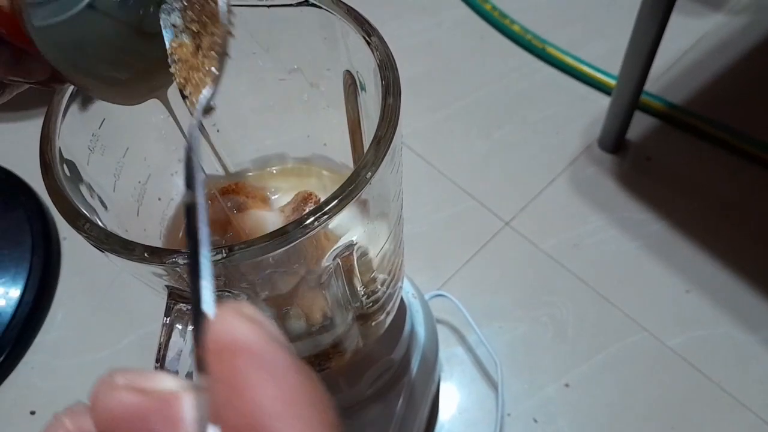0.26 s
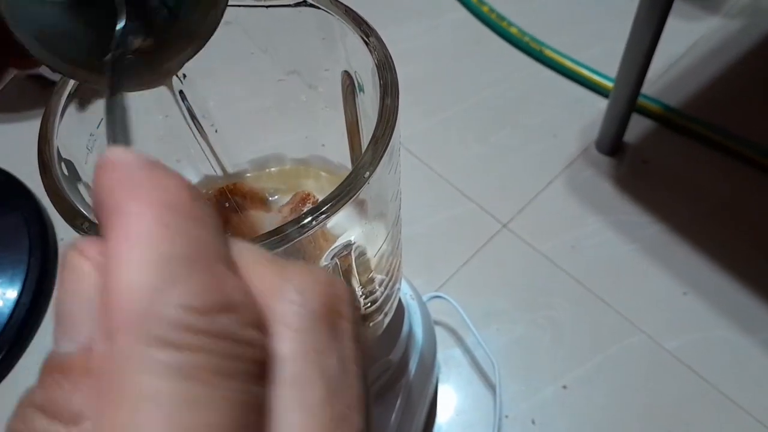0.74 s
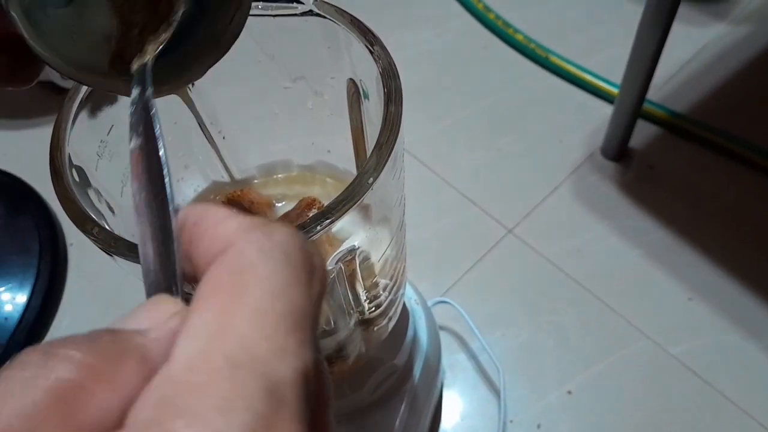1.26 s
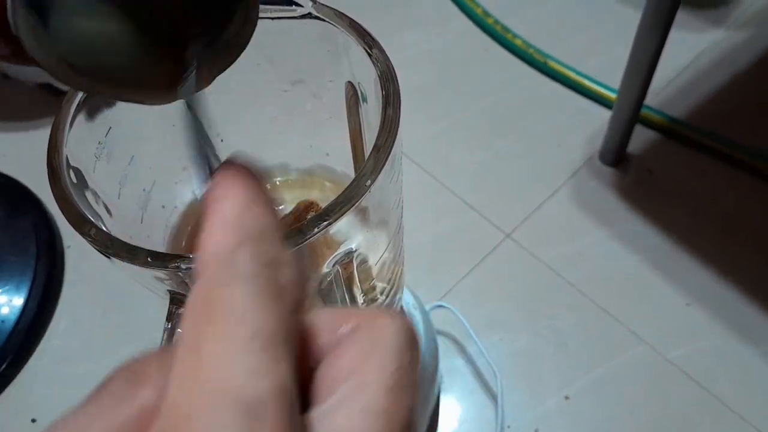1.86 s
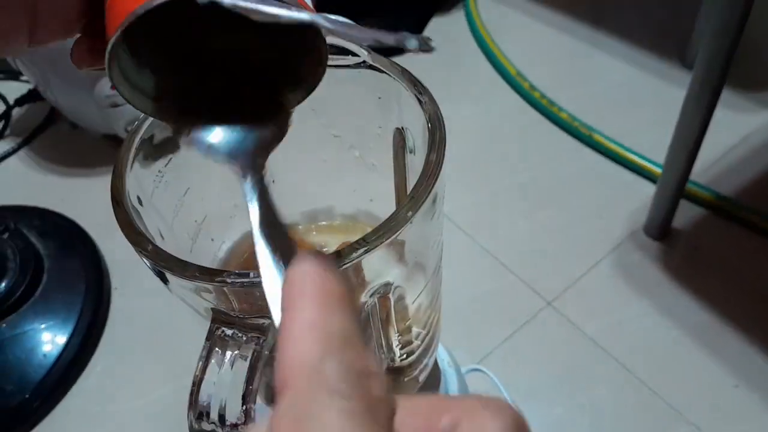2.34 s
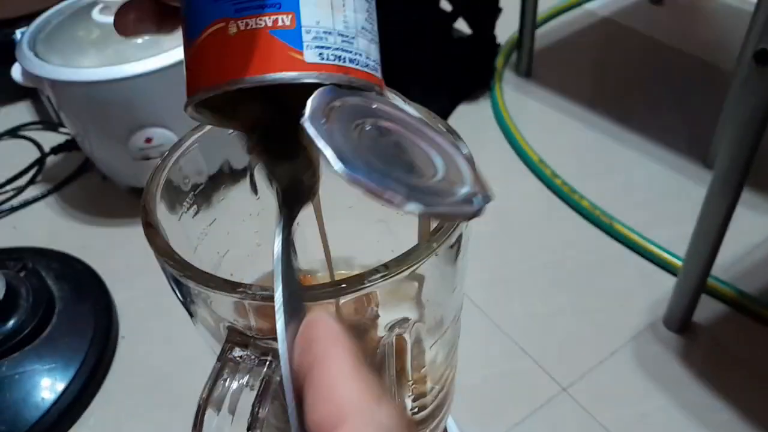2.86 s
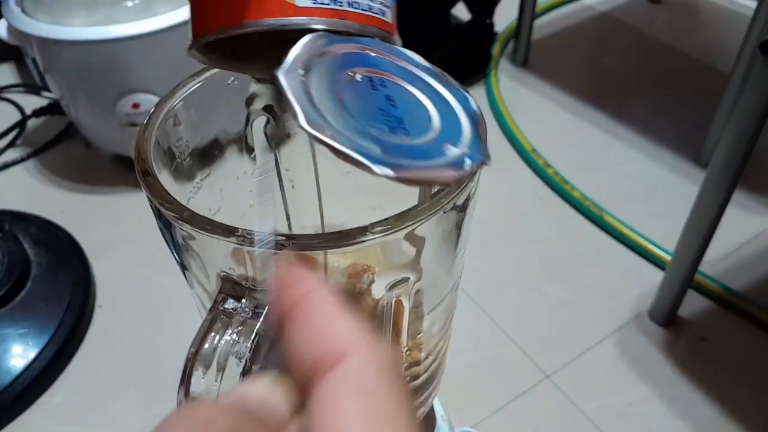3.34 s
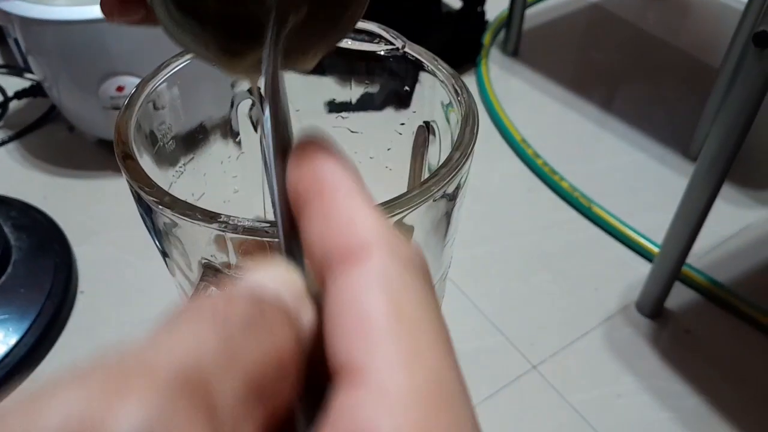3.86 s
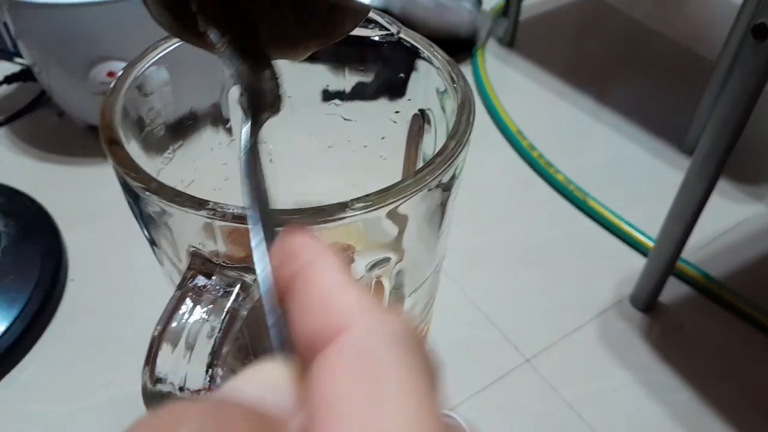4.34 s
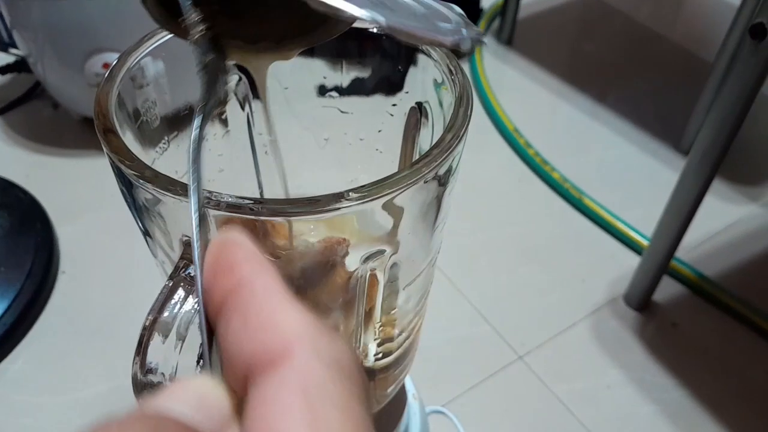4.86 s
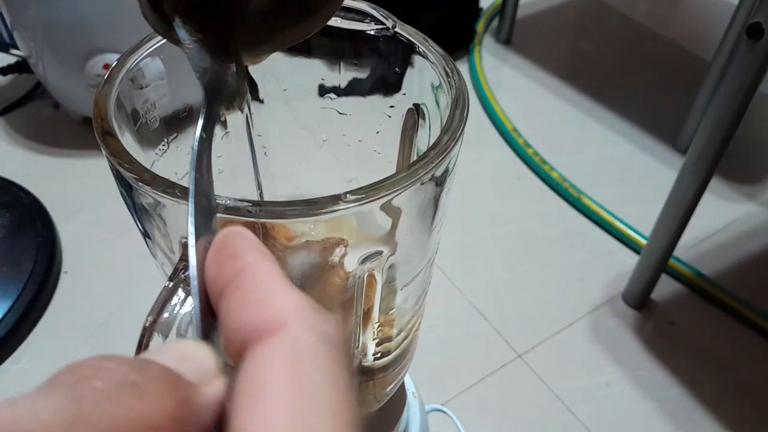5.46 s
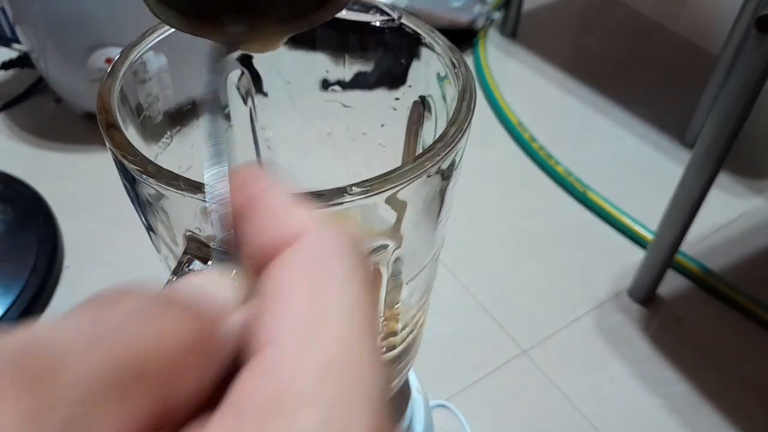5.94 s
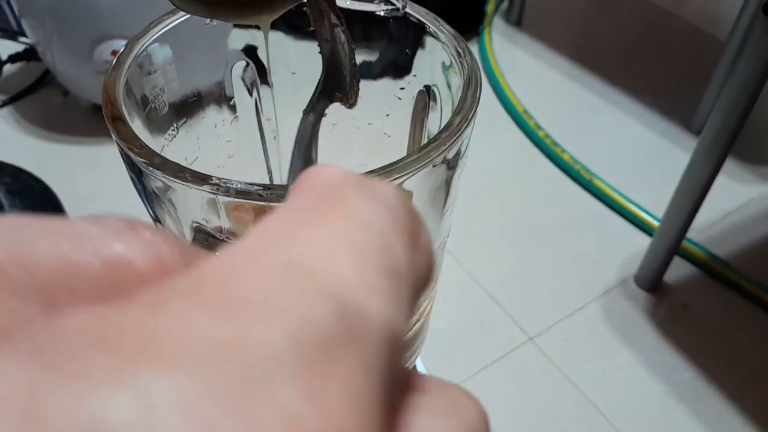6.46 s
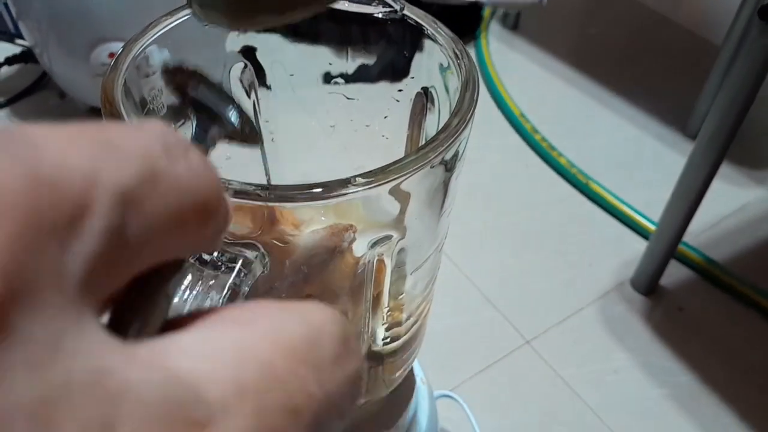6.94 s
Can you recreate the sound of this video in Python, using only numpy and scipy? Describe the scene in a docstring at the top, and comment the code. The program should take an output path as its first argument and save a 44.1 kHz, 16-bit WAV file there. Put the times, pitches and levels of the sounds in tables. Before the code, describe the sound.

Close, dry-sounding spoon work in a small kitchen: a metal spoon strikes and drags along the inner wall of a tin damped by hand and sticky milk. Bright scrapes and tiny squeaks come first, then softer wet strokes, a squeaky burst midway, then duller hollow knocks and scrapes to the end. The tin sits left of centre with short shifting reflections; a quiet wavering motor hum and low rumble continue underneath.

```python
"""A steel spoon knocks and scrapes inside a tin of thick milk held over a glass blender jar.
Hand and milk damp the tin: each blow, a push plus noisy chatter into damped modes, is a hollow clack
with a short metallic ring. Strokes drive the same modes with trains of tiny slips and rasp;
gliding tones squeak. Random echoes make the small kitchen; a motor hums faintly in low rumble."""
import sys
import numpy as np
from scipy import signal
from scipy.fft import rfft, irfft
from scipy.io import wavfile
from scipy.ndimage import map_coordinates

SR = 44100
rng = np.random.default_rng(int(sys.argv[2]) if len(sys.argv) > 2 else 0)


def digitize_waveform(pressure):
    """Quantize a signal to 16-bit integers and store it at the path in sys.argv[1].

    Rows of a 2-D input are taken as channels; values are limited to [-1, 1].
    """
    field = np.atleast_2d(pressure).T
    bounded = np.clip(field, -1, 1)
    quanta = np.round(bounded * 32767).astype(np.int16)
    wavfile.write(sys.argv[1], SR, quanta)


N = 317961

HOLLOW_HZ = 1040  # usual pitch of the tin's hollow
# mode of the tin's base: [f/Hz, width/Hz, relative drive/dB]
BASE_MODES = [(618.7, 44, 0)]


def amp(db):
    """Decibels to gain."""
    return 10 ** (np.asarray(db) / 20)


def unit(x):
    """Scales to rms 1."""
    return x / np.sqrt(np.mean(x ** 2) + 1e-20)


def read(points, hz):
    """Reads a table of [f/Hz, value] on a log-frequency axis."""
    f, value = np.transpose(points)
    return np.interp(np.log(hz + 1), np.log(f), value)


def track(points, s):
    """Reads a table of [t/s, value] at time s."""
    return np.interp(s, *np.transpose(points))


def add(mix, s, sound):
    """Adds a sound into the mix at time s."""
    part = mix[round(s * SR):][:len(sound)]
    part += sound[:len(part)]


def colour(x, points):
    """Filters by a table of [f/Hz, gain/dB]."""
    n = x.shape[-1]
    gain_db = read(points, np.fft.rfftfreq(n, 1 / SR))
    return irfft(rfft(x) * amp(gain_db), n)


def wander(n, rate_hz):
    """Smooth chance of size about 1, with rate_hz new values a second."""
    knots = np.arange(n) * rate_hz / SR
    return np.interp(knots, np.arange(4096), rng.standard_normal(4096))


def background(air_db=-51.5, waver_db=2, waver_hz=1.684, waver_rate_hz=9, left_db=1):
    """A motor's wavering hum in the low rumble of the room, partly alike on both sides."""
    # rumble spectrum: [f/Hz, relative density/dB]
    rumble = [(25, -21), (36, -31), (50, -0.5), (68, 2.5), (100, 1), (150, -8), (260, -9.5), (420, -17),
              (750, -16), (2000, -23), (3200, -31.5), (15000, -43)]
    # left-right correlation of the rumble: [f/Hz, likeness]
    likeness = [(25, 0.59), (60, 0.87), (150, 0.96), (350, 0.65), (1000, 0.046), (8000, 0.069)]
    # hum partials ahead of the left-right tilt: [f/Hz, mean level/dB]
    hum_partials = [(95.5, -64.5), (119.6, -54), (240, -70), (302, -73), (340, -74)]
    same = np.clip(read(likeness, np.fft.rfftfreq(N, 1 / SR)), -1, 1)
    a, b = rfft(rng.standard_normal((2, N)))
    pair = np.array([a, same * a + np.sqrt(1 - same ** 2) * b])
    air = unit(colour(irfft(pair, N), rumble))
    hum = 0
    for hz, db in hum_partials:
        level = amp(db + waver_db * wander(N, waver_rate_hz))
        turns = np.cumsum(hz + waver_hz * wander(N, waver_rate_hz)) / SR
        hum = hum + level * unit(np.sin(2 * np.pi * turns))
    return (amp(air_db) * air + hum) * amp([[left_db], [-left_db]])


def echoes(near_db=-13, near_t60_s=0.076, room_db=-20, density_per_s=4000):
    """One pair of responses: quick scatter off jar and hands, then the tiled room."""
    # room decay: [f/Hz, t60/s]
    decay = [(300, 0.31), (1000, 0.17), (3000, 0.2), (7000, 0.27), (15000, 0.16)]
    t = np.arange(SR // 2) / SR
    signs = rng.choice([-1., 1.], (2, 2, len(t)))
    near, far = signs * (rng.random((2, 2, len(t))) < density_per_s / SR)
    near = near * (t > .001) * amp(-60 * t / near_t60_s)
    f, frame_s, z = signal.stft(far * (t > .008), SR, nperseg=256)
    z = z * amp(-60 * frame_s / read(decay, f)[:, None])
    far = signal.istft(z, SR, nperseg=256)[1][:, :len(t)]
    return (amp(near_db) * unit(near) + amp(room_db) * unit(far)) / np.sqrt(len(t))


def kitchen(x, count=3):
    """The tin is close on the left and sways in the hand, so its echoes keep changing."""
    # right side: [f/Hz, level re left/dB]
    right_ear = [(300, -14), (600, -3.5), (1100, -22.5), (2000, -7.5), (2900, -2), (4500, -14), (8000, -8),
                 (14000, -26)]
    t = np.arange(N) / SR
    lag_s = np.interp(t, [1.5, 3, 7], [.00036, .00027, .00025])  # the right side hears it later
    right = colour(map_coordinates(x, [(t - lag_s) * SR], order=3), right_ear)
    # the wall radiates all round: [f/Hz, gain/dB]
    thrown = colour(x, [(600, -4), (1100, 3), (2800, 7), (6000, 1.0), (14000, 4.0)])
    out = np.array([x, right])
    for k in range(count):
        share = np.sqrt(2 / count) * np.cos(np.pi * (t + k / count))
        out = out + signal.oaconvolve((thrown * share)[None], echoes(), axes=1)[:, :N]
    return out


def ring(force, modes, low_hz, shift=1, spot_db=0):
    """Drives damped modes of alternating sign, to rms 1; the spot touched favours some, shift may glide."""
    out = 0
    for k, (hz, width_hz, db) in enumerate(modes):
        turn = np.exp(2j * np.pi * np.cumsum(hz * shift * np.ones(len(force))) / SR)
        r = np.exp(-np.pi * width_hz / SR)
        gain = (-1) ** k * amp(db + spot_db * rng.standard_normal())
        out = out + gain * (turn * signal.lfilter([1 - r], [1, -r], force / turn)).imag
    high_pass = signal.butter(3, low_hz, "high", fs=SR, output="sos")  # small things radiate little bass
    return unit(signal.sosfilt(high_pass, out))


def tin(s, forces, pitch_hz, grip=1, spot_db=4.0, focus_db=8, focus_octaves=0.099):
    """The four voices of spoon and tin at time s: hollow with base, wall, steel, edge."""
    # modes of hollow (at its usual pitch), wall before focus, steel on steel, and the spoon's
    # highest, crowded modes: [f/Hz, width/Hz, relative drive/dB]
    hollow_modes = [(998, 98.9, 2.53), (1110, 115.1, 1.65)]
    wall_modes = [(1740, 260, -5.5), (2026, 170, -2), (2421, 54, 5.5), (2885, 140, -2.5), (3200, 93, -2.5),
                  (3503, 183, -3), (4010, 58, -7.5)]
    steel_modes = [(4344, 520, 2.5), (5060, 410, 5), (5250, 63, 9.5), (5650, 440, 3), (6420, 22, -15)]
    edge_modes = [(7620, 1900, -6.5), (8820, 183, 0.5), (9600, 1140, -8), (11600, 530, -5.5),
                  (12900, 1070, -7.5), (15600, 530, -13)]
    # the part of the wall touched favours modes near one pitch: [t/s, f/Hz]
    wall_focus = [(0.65, 2270), (0.8, 2990), (1.74, 2660), (2.15, 3020), (2.52, 2500), (3.0, 3280),
                  (3.62, 3200), (4.2, 2720), (5.35, 2700), (6.6, 2440)]
    # base strength, rising through the scene and falling again at the end: [t/s, level re hollow/dB]
    base_strength = [(0.6, -29), (3.6, -24), (4.5, -18.5), (5.8, -16.5), (6.7, -29)]
    base = amp(track(base_strength, s)) * ring(forces[0], BASE_MODES, low_hz=470)
    focus_hz = track(wall_focus, s)
    focused = []
    for hz, width_hz, db in wall_modes:
        nearness = np.exp(-(np.log2(hz / focus_hz) / focus_octaves) ** 2)
        focused.append((hz, width_hz, db + focus_db * nearness))
    hollow = ring(forces[0], hollow_modes, low_hz=344, shift=pitch_hz / HOLLOW_HZ)
    wall = ring(forces[1], focused, low_hz=1400, shift=grip, spot_db=spot_db)
    steel = ring(forces[2], steel_modes, low_hz=3360, shift=grip, spot_db=spot_db)
    edge = ring(forces[2], edge_modes, low_hz=6170, shift=grip)
    return hollow + base, wall, steel, edge


def stick_slip(n, rate_hz=700, glide=0.058, glide_rate_hz=25, jitter=.017, jitter_rate_hz=1200):
    """Nearly regular slips whose rate follows the unsteady speed of the hand."""
    speed = 1 + glide * wander(n, glide_rate_hz) + jitter * wander(n, jitter_rate_hz)
    turns = np.cumsum(rate_hz * speed) / SR
    slips = np.diff(np.floor(turns), prepend=0)
    return unit(slips - slips.mean())


def drag(s, n, pitch_hz, slips_per_s=1800, slip_spread_db=3.5, judder_db=3.0, judder_rate_hz=130,
         rub=0.097, grip_drift=0.016, drift_rate_hz=22, snags_per_s=110, snag_db=20):
    """The edge drags in slips, even or uneven, and snags; modes bend as the point of contact travels."""
    # evenness of stick-slip, less once the edge is coated with milk: [t/s, share 0-1]
    bite_track = [(0.8, 0.62), (3.7, 0.22), (4.6, 0), (6.6, 0.18)]
    slip_size = amp(slip_spread_db * np.minimum(rng.exponential(1, SR), 4))
    slips = (rng.random(SR) < slips_per_s / SR) * slip_size
    grit = unit(slips - slips.mean() + rub * rng.standard_normal(SR))[:n]
    snags = amp(snag_db) * (rng.random(SR) < snags_per_s / SR)[:n]
    bite = np.clip(track(bite_track, s), 0, 1)
    rasp = np.sqrt(1 - bite) * grit + np.sqrt(bite) * stick_slip(n)
    judder = amp(judder_db * wander(n, judder_rate_hz))
    forces = (np.array([grit, rasp, rasp]) + snags) * judder
    return tin(s, forces, pitch_hz, 1 + grip_drift * wander(n, drift_rate_hz))


def base_rubs():
    """Rubbing the bottom of the tin, noise into its base mode, gives a low, dull note."""
    # rubs: [t/s, length/s, level/dB]
    rub_events = [(1.88, 0.06, -42.5), (3.722, 0.033, -40), (5.685, 0.03, -41), (5.876, 0.043, -37),
                  (6.385, 0.13, -47.5)]
    out = np.zeros(N)
    for s, length_s, db in rub_events:
        n = round(length_s * SR)
        note = ring(rng.standard_normal(n), BASE_MODES, low_hz=463)
        add(out, s, amp(db) * note * signal.windows.tukey(n, .5))
    return out


def slides(pitch_hz=1010, wall_db=-9, steel_db=-17, edge_db=-17):
    """Soft, wet strokes through the milk, with little treble; voice levels are re hollow."""
    # slides: [t/s, length/s, hollow level/dB]
    slide_events = [(0.691, 0.073, -27.5), (2.194, 0.17, -44.5), (2.556, 0.093, -41.5), (2.831, 0.11, -48),
                    (3.056, 0.15, -51.5), (3.282, 0.024, -42.5), (3.333, 0.13, -51), (3.569, 0.028, -29),
                    (3.744, 0.066, -38.5), (3.996, 0.1, -50), (4.188, 0.19, -43.5), (4.89, 0.052, -43.5),
                    (5.442, 0.042, -35.5), (5.911, 0.17, -48), (6.277, 0.052, -40.5), (6.388, 0.091, -42)]
    out = np.zeros(N)
    for s, length_s, db in slide_events:
        n = round(length_s * SR)
        voices = amp([[0], [wall_db], [steel_db], [edge_db]]) * drag(s + length_s / 2, n, pitch_hz)
        add(out, s, amp(db) * voices.sum(0) * signal.windows.tukey(n, .5))
    return out


def squeaks(jitter=.022, jitter_rate_hz=900, octave_db=-14):
    """Even stick-slip of the edge gives a short, unsteady, gliding whistle with its octave."""
    # squeaks: [t/s, length/s, first f/Hz, last f/Hz, level/dB]
    squeak_events = [(0.738, 0.016, 3870, 3060, -19), (0.774, 0.024, 2940, 2690, -29.5),
                     (0.818, 0.018, 2705, 2860, -26), (0.848, 0.0182, 2830, 3595, -24),
                     (1.526, 0.026, 2968, 2627, -30.5), (1.886, 0.039, 5250, 5260, -35),
                     (2.181, 0.0029, 3900, 3800, -26), (3.661, 0.041, 3194, 3640, -27.5),
                     (3.943, 0.025, 2915, 2900, -38)]
    out = np.zeros(N)
    for s, length_s, first_hz, last_hz, db in squeak_events:
        n = round(length_s * SR)
        hz = np.linspace(first_hz, last_hz, n) * (1 + jitter * wander(n, jitter_rate_hz))
        angle = 2 * np.pi * np.cumsum(hz) / SR
        whistle = unit(np.sin(angle) + amp(octave_db) * np.sin(2 * angle))
        add(out, s, amp(db) * whistle * signal.windows.tukey(n, .6))
    return out


def touches(level_db=-18, skid_s=0.0029, hollow_db=-3):
    """Light contacts of the spoon's edge, decaying noise bursts, tick and softly stir the hollow."""
    # touches: [t/s, level ahead of level_db/dB]
    touch_events = [(0.536, -38.5), (0.5736, -37), (0.589, -39.5), (0.616, -38.5), (0.9835, -42.5),
                    (2.82, -37.5), (5.3831, -30), (5.442, -39), (5.4636, -48)]
    out, t = np.zeros(N), np.arange(SR // 8) / SR
    for s, db in touch_events:
        forces = rng.standard_normal((3, len(t))) * np.exp(-t / skid_s)
        hollow, wall, steel, edge = tin(s, forces, HOLLOW_HZ)
        add(out, s, amp(db + level_db) * (amp(hollow_db) * hollow + .5 * (wall + steel + edge)))
    return out


def strokes(hollow_db=4.0, wall_db=3.0, steel_db=4, edge_db=5.0, contact_s=0.0019, lift_s=0.082,
            touch_down_db=-16.5, lift_db_per_s=519, sag_octaves_per_s=0.32):
    """Firm scrapes along the wall: the spoon presses in, holds, lifts; pitch sinks as it draws back."""
    # scrapes, levels ahead of the voice gains: [t/s, press-in/s, hold/s, level/dB, wall/dB,
    # steel/dB, fine rasp/dB (these three re level), hollow f at mid-hold/Hz]
    stroke_events = [(0.686, 0.059, 0.11, -32, -3.5, -7.5, -11.5, 1153),
                     (0.836, 0.013, 0.022, -34, -14, -30, -32, 1050),
                     (1, 0.019, 0.0018, -37, -1.5, -15, -15, 1180),
                     (1.032, 0.014, 0.045, -36, -11, -29, -24.5, 1080),
                     (1.448, 0.009, 0.056, -33.5, -4.5, -9, -16, 1086),
                     (1.491, 0.039, 0.0047, -37, 1.5, 6.5, 0.5, 1110),
                     (1.762, 0.017, 0.0027, -26.5, -6.5, -15.5, -22, 1110),
                     (1.83, 0.012, 0.002, -31.5, -12, -27, -23, 1076),
                     (1.869, 0.018, 0.014, -40, 5, 5.5, 7.5, 1050),
                     (2.765, 0.005, 0.055, -38, -18.5, -33, -25.5, 1036),
                     (3.628, 0.0058, 0.016, -33, -3, -22, -31, 1116),
                     (3.639, 0.024, 0.022, -37, 0.5, -1, -3, 1134),
                     (3.961, 0.0075, 0.0017, -38, 5, -2, 3, 1270),
                     (4.506, 0.0082, 0.008, -30.5, -9.5, -13, -17, 1054),
                     (4.589, 0.016, 0.0035, -27, -16.5, -22, -21.5, 1040),
                     (4.776, 0.023, 0.051, -30.5, -9, -12.5, -17, 1030),
                     (5.069, 0.005, 0.066, -42, -4, -12.5, -13.5, 1040),
                     (5.133, 0.041, 0.0054, -28, -9, -14.5, -14, 1040),
                     (5.359, 0.022, 0.002, -37, -7, -14, -14.5, 1100),
                     (5.488, 0.0039, 0.0023, -25, -17.5, -21, -28, 1012),
                     (5.656, 0.036, 0.0073, -25, -8.5, -12.5, -14, 1095),
                     (5.763, 0.016, 0.0046, -30.5, -11.5, -16.5, -17.5, 1040),
                     (6.042, 0.0048, 0.005, -38.5, -16, -20, -21, 1066),
                     (6.078, 0.0058, 0.0043, -33.5, -15.5, -18, -25, 1040),
                     (6.508, 0.035, 0.037, -27.5, -14, -24, -24, 1040),
                     (6.584, 0.0043, 0.059, -35.5, -15, -26, -30, 1105),
                     (6.637, 0.031, 0.0089, -21, -12.5, -26.5, -26, 1026),
                     (6.889, 0.0041, 0.019, -27, -13, -24, -21.5, 1023)]
    out = np.zeros(N)
    for s, press_s, hold_s, db, wall_rel_db, steel_rel_db, rasp_rel_db, pitch_hz in stroke_events:
        t = np.arange(round((press_s + hold_s + lift_s) * SR)) / SR
        press_db = touch_down_db * np.maximum(1 - t / max(press_s, 1e-3), 0)
        fall_db = lift_db_per_s * np.maximum(t - press_s - hold_s, 0)
        pressure = amp(db + press_db - fall_db)
        gains = amp([[hollow_db], [wall_db + wall_rel_db],
                     [steel_db + steel_rel_db], [edge_db + rasp_rel_db]])
        sagging_hz = pitch_hz * 2 ** (-sag_octaves_per_s * (t - press_s - hold_s / 2))
        voices = drag(s + press_s, len(t), sagging_hz)
        add(out, s, pressure * (gains * voices).sum(0) * np.minimum(t / contact_s, 1))
    return out


def blows(hollow_db=-14, wall_db=-13, steel_db=-16, edge_db=-16, soft_chatter=0.1, hard_chatter=0.34,
          grip_spread=0.038, cushion_s=0.001, jolt_db=-44):
    """Each blow is one push and a burst of chatter, eased in by the film of milk; the tin jolts."""
    # blows, levels ahead of the voice gains: [t/s, level/dB, hollow f/Hz, wall re level/dB,
    # steel tick re level/dB, chatter decay/s]
    blow_events = [(0.65, -9, 1047, -19.5, -30, 0.0016), (0.764, -18, 1036, -8, -20, 0.0031),
                   (1.021, -14, 1148, -8, -18, 0.0025), (1.331, -21, 923, -11.5, -18, 0.00085),
                   (1.434, -10, 1040, -16.5, -16.5, 0.0021), (1.742, -10.5, 1082, -16, -23.5, 0.0023),
                   (1.785, -16.5, 1145, -15, -18, 0.0021), (1.88, -17, 1120, -9.5, -34, 0.0039),
                   (1.976, -33, 956, -11, -19, 0.0041), (2.138, -9.5, 1110, -8.5, -12.5, 0.0025),
                   (2.144, -10.5, 1040, -19, -21, 0.0018), (2.184, -24.5, 1126, -14, -10.5, 0.0031),
                   (2.518, -21, 1053, -11, -9, 0.0021), (2.758, -26.5, 996, -14.5, -18.5, 0.0066),
                   (2.803, -27.5, 987, -11.5, -15.5, 0.0017), (3.028, -17, 1035, -19.5, -20.5, 0.0079),
                   (3.275, -22.5, 1027, -19.5, -18.5, 0.0058), (3.561, -16, 1012, -17, -16, 0.0048),
                   (3.618, -8.5, 1116, -14.5, -21.5, 0.0028), (3.731, -22.5, 1040, -12, -12.5, 0.0017),
                   (3.887, -20.5, 998, -14.5, -14, 0.0063), (3.946, -14, 1095, -7, -13, 0.003),
                   (4.16, -21.5, 1020, -12.5, -11.5, 0.0029), (4.168, -19.5, 1030, -15, -39, 0.0016),
                   (4.228, -34.5, 1110, -1.5, -4, 0.0038), (4.474, -18, 1044, -18, -20.5, 0.0017),
                   (4.515, -32, 1040, -4, -24, 0.0011), (4.57, -31, 1010, -19, -12, 0.0022),
                   (4.611, -27, 1040, -21, -16, 0.0014), (4.749, -16.5, 1040, -20, -22, 0.00083),
                   (4.837, -13.5, 1022, -35, -40, 0.0008), (5.064, -23, 1047, -13.5, -16.5, 0.011),
                   (5.313, -22.5, 1074, -18.5, -21, 0.00093), (5.32, -20, 1054, -18, -21.5, 0.0055),
                   (5.496, -18, 1040, -9, -10.5, 0.0015), (5.627, -20.5, 1030, -10, -15.5, 0.0057),
                   (5.691, -15.5, 1056, -14.5, -30, 0.0027), (5.761, -33.5, 1100, -8, -10, 0.0027),
                   (5.89, -14.5, 1040, -13.5, -16, 0.0009), (6.044, -28.5, 1056, -19, -19.5, 0.0019),
                   (6.088, -31.5, 1000, -7.5, -8, 0.0055), (6.257, -16, 1074, -12, -11.5, 0.0015),
                   (6.406, -32.5, 1140, -14.5, -13, 0.0021), (6.656, -16, 1110, -32, -33, 0.003),
                   (6.666, -12.5, 1040, -20, -39, 0.0026), (6.885, -9, 1040, -23, -24.5, 0.0029)]
    # the whole tin jolting in the hand: [f/Hz, width/Hz, relative drive/dB]
    jolt_modes = [(215, 80, 0)]
    out, t = np.zeros(N), np.arange(SR // 8) / SR
    push = 1. * (t == 0)
    for s, db, pitch_hz, wall_rel_db, steel_rel_db, chatter_s in blow_events:
        burst = np.exp(-t / max(chatter_s, 1e-4)) * (1 - np.exp(-t / cushion_s))
        chatter = rng.standard_normal((3, len(t))) * burst
        forces = push + chatter * np.array([[soft_chatter], [hard_chatter], [1]])
        grip = 1 + grip_spread * rng.standard_normal()
        hollow, wall, steel, edge = tin(s, forces, pitch_hz, grip)
        clack = amp(hollow_db) * hollow + amp(wall_db + wall_rel_db) * wall
        tick = amp(steel_rel_db) * (amp(steel_db) * steel + amp(edge_db) * edge)
        jolt = amp(jolt_db) * ring(push, jolt_modes, low_hz=120)
        add(out, s, amp(db) * (clack + tick + jolt))
    return out


def scene():
    """Spoon and tin in the kitchen, over hum and rumble that sink and swell slowly."""
    # background swell: [t/s, gain/dB]
    swell_track = [(0.2, 2), (0.8, 3), (3.6, 2), (4.5, -2.5), (5.4, 2.5), (6.7, 3.5)]
    swell = amp(track(swell_track, np.arange(N) / SR))
    spoon = blows() + touches() + strokes() + slides() + base_rubs() + squeaks()
    return kitchen(spoon) + swell * background()


def record(dry, edge_hz=15800):
    """The recorder's band limit, a linear-phase low-pass."""
    low_pass = signal.firwin(161, edge_hz, window=("kaiser", 9), fs=SR)
    return signal.oaconvolve(dry, low_pass[None], "same")


dry = scene()
out = record(dry)
digitize_waveform(out)
```